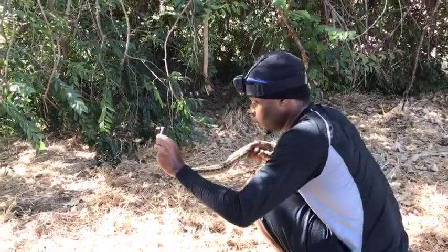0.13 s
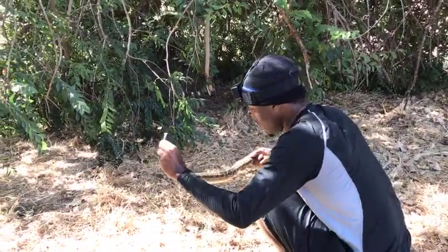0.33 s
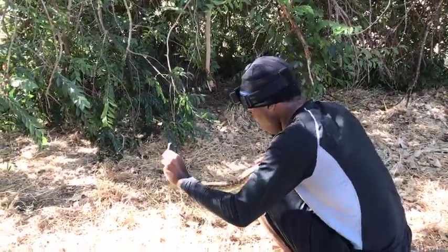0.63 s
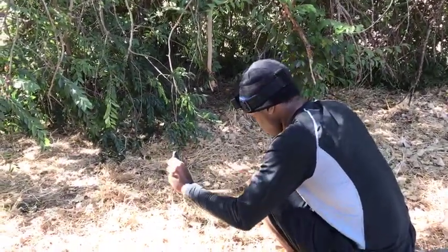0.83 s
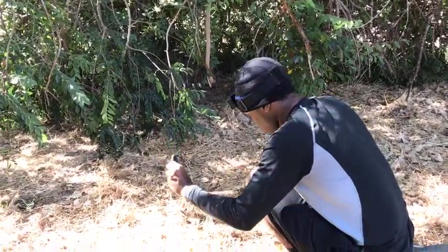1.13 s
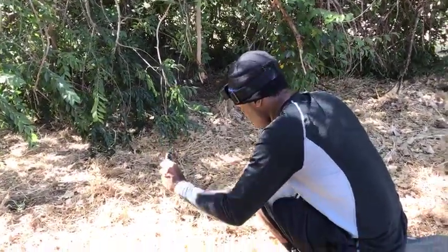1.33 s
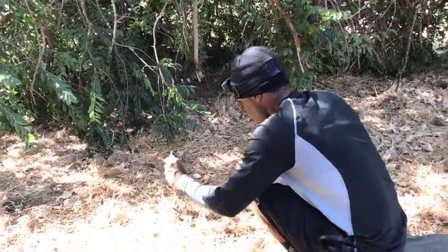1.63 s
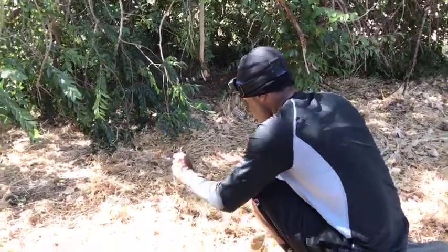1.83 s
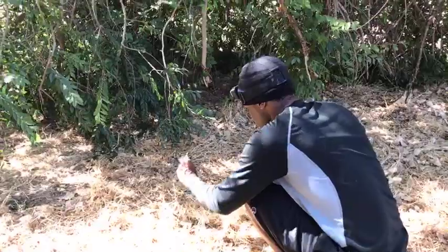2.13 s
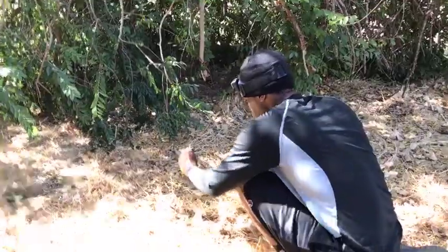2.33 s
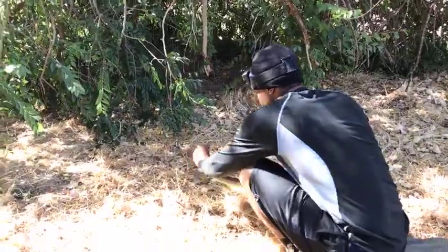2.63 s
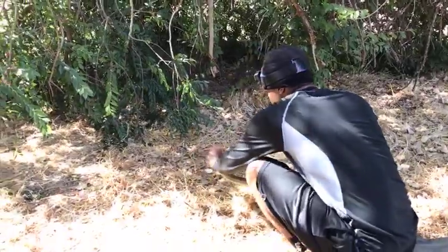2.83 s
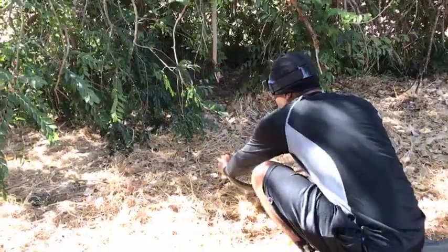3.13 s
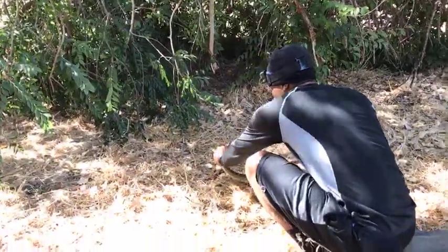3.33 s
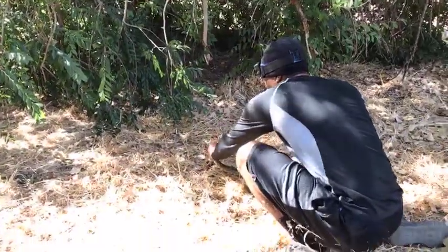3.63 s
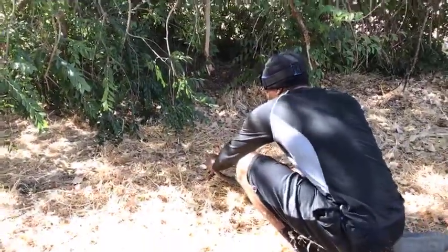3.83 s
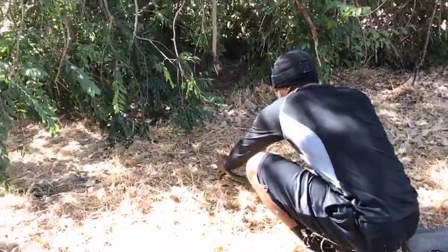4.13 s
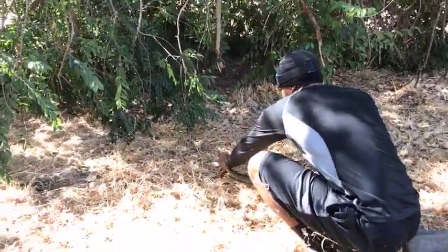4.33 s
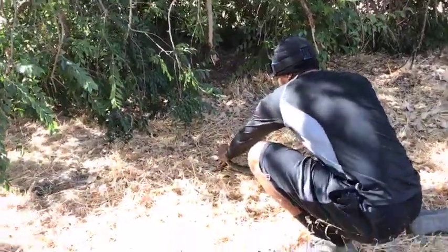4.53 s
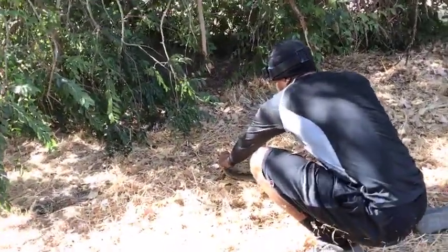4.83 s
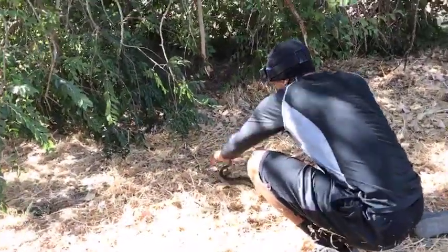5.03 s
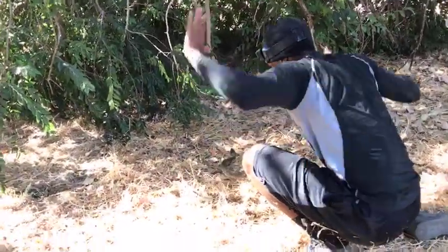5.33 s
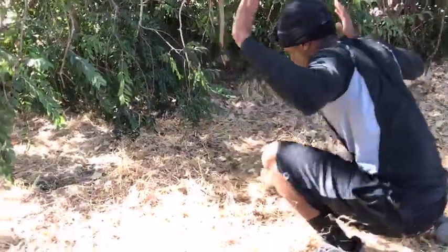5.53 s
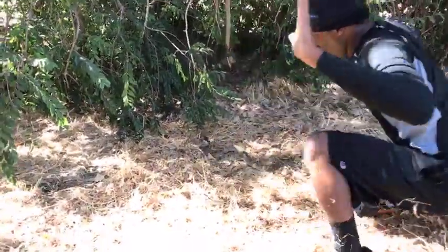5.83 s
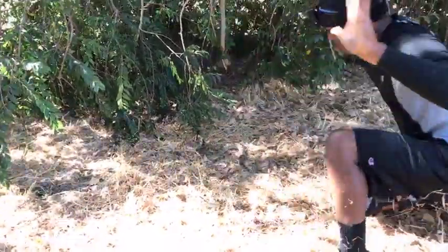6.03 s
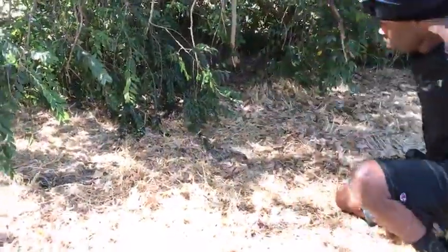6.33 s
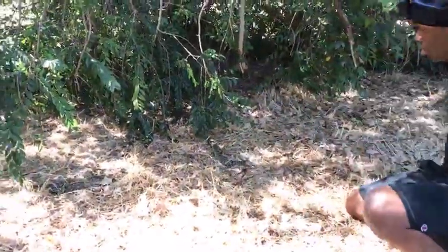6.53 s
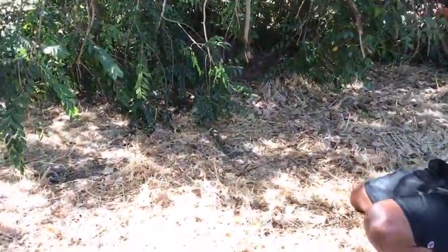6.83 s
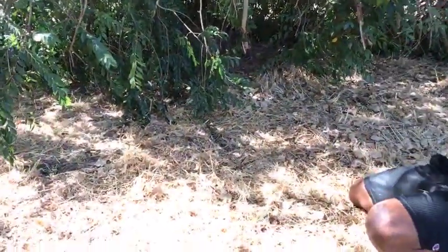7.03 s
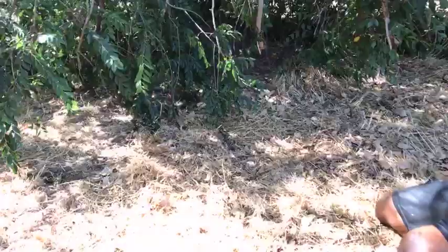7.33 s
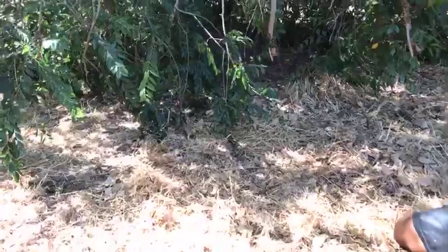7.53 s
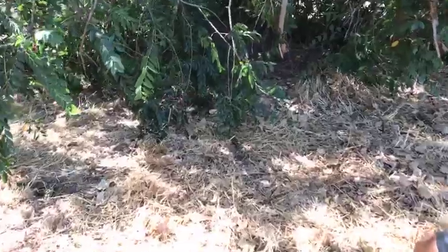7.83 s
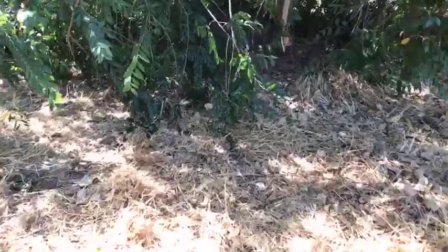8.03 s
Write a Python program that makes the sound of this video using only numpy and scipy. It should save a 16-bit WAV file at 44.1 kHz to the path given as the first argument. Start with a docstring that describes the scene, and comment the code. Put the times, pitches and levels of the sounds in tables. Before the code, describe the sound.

A rattlesnake close to the microphone in dry brush gives quick, faint runs of rattle flicks, then falls silent while dry stems crackle and snap. After a pause it flicks again and breaks into a steady, bright, sizzling buzz that surges strongly, dips, throbs, and rises again at the end. Feet scuff leaf litter with dull knocks. Far traffic rumbles softly underneath with a low machine hum.

```python
"""Rattlesnake in dry brush

In front of one microphone the snake flicks its rattle in short runs, pauses, then buzzes without a break, surging
louder and later throbbing: random clacks ring the hollow segments, with echoes off ground and twigs. Dry grass
crackles under the snake and litter under feet, as clumps of tiny impacts. Far off lie filtered-noise traffic,
a humming machine and a droning vehicle."""
import sys
import numpy as np
from scipy import signal
from scipy.fft import rfft, irfft
from scipy.io import wavfile
from scipy.ndimage import map_coordinates

SR = 44100
rng = np.random.default_rng(int(sys.argv[2]) if len(sys.argv) > 2 else 0)


def store_wav(level_fs):
    """Save 16-bit WAV to argv[1]."""
    pcm = np.round(np.clip(np.atleast_2d(level_fs), -1, 1) * 32767)
    wavfile.write(sys.argv[1], SR, pcm.T.astype(np.int16))


N = 360297
T = np.arange(N) / SR  # time in seconds

# colour of the hollow segments: [f/Hz, relative level/dB]
SHELL_COLOUR = [(900, -45), (2100, -21.5), (2900, -11.5), (3600, -9.5), (4300, -4.5), (5200, -1.5),
                (6200, -2), (7100, -1.5), (8500, -4.5), (9600, -9.5), (10500, -10), (11600, -7.5),
                (13200, -4), (15400, -8)]
# their sharper resonances: [f/Hz, height above the colour/dB]
SHELL_RESONANCES = [(4470, 4.5), (5220, 4), (6450, 2.5), (7120, 5), (8280, 3.5)]
# the resonances move together as the rattle is turned: [t/s, frequency ratio, share of their height]
RATTLE_TURNING = [(0, 1.02, 1.2), (1.2, 1.015, 0.54), (3, .985, 1.1), (4, 0.99, 1.33), (4.55, 1.06, .7),
                  (4.85, 1.06, .1), (5.7, .98, 0.68), (7.15, .977, 0.48), (7.6, 1.01, 0.83),
                  (8.17, 1.07, 0.85)]


def rattle(mode_width_hz=150, ground_gain=0.23, twig_gain=0.23):
    """The clacks ring the hollow shells; echoes off the ground and nearby twigs make the colour swirl."""
    ring = colour(clacking() * shaking(), SHELL_COLOUR)
    t, ratio, share = np.transpose(RATTLE_TURNING)
    ratio_now, share_now = np.interp(T, t, ratio), np.interp(T, t, share)
    for hz, height_db in SHELL_RESONANCES:
        extra_gain = amp(height_db * share_now) - 1
        ring = ring + extra_gain * resonate(ring, hz * ratio_now, mode_width_hz)
    # detours of about 0.2 m and 1 m
    ground_echo = ground_gain * echo(ring, delay_s=0.000601, travel_s=.00007, hz=3)
    twig_echo = twig_gain * echo(ring, delay_s=.003, travel_s=.0001, hz=1.2)
    return posture(0.91 * (ring + ground_echo + twig_echo))


# speed of the tail: [t/s, turns per s]
TAIL_SPEED = [(0, 155), (3.2, 144), (3.9, 175), (5.05, 180), (5.3, 156), (6.1, 179), (6.85, 162),
              (7.4, 143), (7.85, 177), (8.17, 170)]


def clacking(turn_db=1.5, rebound_db=0.9, lopsided_db=0.45, jitter=0.019, uneven_db=0.5):
    """Loose segments clack in a cluster at each turn of the tail and again on the rebound."""
    speed = curve(TAIL_SPEED) * (1 + jitter * wander(25))
    turn = 2 * np.pi * np.cumsum(speed) / SR
    beat_db = turn_db * np.cos(turn) + rebound_db * np.cos(2 * turn)
    beat_db += lopsided_db * np.cos(turn / 2)  # every other turn is stronger
    return unit(clicks(per_s=12000, spread_db=2.0) * amp(beat_db + uneven_db * wander(220)))


# evenly spaced flicks: [start t/s, number of flicks, interval/s, first relative level/dB, last relative level/dB]
TAIL_FLICKS = [(0.008, 2, 0.063, -41, -41), (0.119, 11, 0.05, -40, -48), (0.685, 5, .0495, -47, -49),
               (1.184, 3, .0595, -51.5, -48.5), (1.412, 1, 0, -50.5, -50.5),
               (1.494, 3, 0.0604, -46.5, -49.5), (1.754, 3, 0.066, -49, -52), (3.011, 2, .065, -49, -48.5),
               (3.129, 7, 0.047, -49.5, -51)]
# unbroken shaking, a short bout and a long one: [t/s, relative level/dB]
SHORT_SHAKE = [(.89, -50.5), (1.15, -49)]
LONG_SHAKE = [(3.43, -51.5), (3.68, -51), (3.78, -49.5), (4.48, -48), (4.83, -45.5), (5.16, -46.2),
              (5.31, -44.5), (5.51, -42), (5.58, -37.5), (5.67, -37), (5.81, -41), (5.9, -36.5),
              (6.38, -34.5), (6.95, -39), (7.35, -42.5), (7.58, -40), (8.03, -39.5), (8.17, -34)]


def shaking(flick_db=3.5, buzz_db=2.15, swell_db=0.53):
    """Strength of the tail's motion: flicks and unbroken bouts add by power."""
    flick_power = 0
    for start, count, interval, first_db, last_db in TAIL_FLICKS:
        for k, db in enumerate(np.linspace(first_db, last_db, round(count))):
            flick_power = flick_power + flick(start + k * interval, db) ** 2
    bouts = level(SHORT_SHAKE) + level(LONG_SHAKE)
    buzz = bouts * amp(buzz_db + throb() + swell_db * wander(17))
    return np.hypot(amp(flick_db) * np.sqrt(flick_power), buzz)


def flick(s, db, rise_s=0.0069, full_length_s=0.019, full_db=-41, linger_per_db=0.0562, roundness=1.38):
    """One throw of the rattle: a quick start, then the segments settle, lingering longer if weak."""
    age = np.maximum(T - s, 0)
    length = full_length_s * np.exp(linger_per_db * (full_db - db))
    settling = np.exp(-(age / length) ** roundness / roundness)
    return amp(db) * np.minimum(age / rise_s, 1) * settling


# late in the long bout the tail sways and the buzz throbs: [t/s, throbs per s, depth/dB]
TAIL_SWAY = [(6.831, 26.8, 1.7), (7.3, 27.0, 2.2), (7.47, 24.1, 5), (7.65, 29.4, 1.5), (8.17, 29, 1)]


def throb(onset_s=.1, sag=0.11):
    """Swing of the buzz in dB as the tail sways; a deep sway also weakens it a little."""
    t, per_s, depth_db = np.transpose(TAIL_SWAY)
    turns = np.cumsum(np.interp(T, t, per_s)) / SR
    onset = np.clip(1 + (T - t[0]) / onset_s, 0, 1)
    depth = np.interp(T, t, depth_db) * onset
    swing = np.cos(2 * np.pi * (turns - np.interp(t[0], T, turns)))
    return depth * (swing - sag * depth)


# tilt of the rattle's treble: [t/s, slope/dB per octave]
TREBLE_TILT = [(0, -3), (1, .5), (3.9, -0.5), (4.65, -2), (5.38, -.7), (5.62, 1.6), (6, -0.8), (6.8, -.3),
               (7.3, 1.5), (7.7, .1)]
# gain of the shells' low band and of their main band: [t/s, level/dB]
LOW_BAND_GAIN = [(0, -9), (1, 4), (3.2, 0.5), (4.25, -6.5), (4.65, 3), (5.8, 2.5), (6.05, -.5), (6.8, -1),
                 (7.35, 6), (7.7, -0.5), (8.17, 3)]
MAIN_BAND_GAIN = [(0, 1.5), (4.3, -1.5), (4.65, 1), (5.26, -2.5), (5.36, 4), (5.82, 4), (6, 0), (7.2, 2.5),
                  (8.17, -0.5)]


def posture(ring, low_hz=3000, main_hz=4600, band_width_hz=680, pivot_hz=6500):
    """The shells radiate different colours as the rattle is held up or lowered."""
    f, t, spectrum = signal.stft(ring, SR, nperseg=256)
    f = f[:, None]
    octaves = np.log2(np.maximum(f, low_hz) / pivot_hz)  # level stays even below low_hz
    db = octaves * curve(TREBLE_TILT, t)
    for hz, band in ((low_hz, LOW_BAND_GAIN), (main_hz, MAIN_BAND_GAIN)):
        db = db + np.exp(-((f - hz) / band_width_hz) ** 2) * curve(band, t)
    return signal.istft(spectrum * amp(db), SR, nperseg=256)[1][:N]


# the snake pushes through dry grass, and feet scuff the litter: [middle t/s, relative level/dB, half length/s]
GRASS_SLITHERS = [(1.48, -61.5, 0.071), (1.695, -51.5, 0.032), (1.89, -64.5, 0.064), (2.18, -60, 0.064),
                  (2.33, -74, 0.12)]
LITTER_SCUFFS = [(5.31, -64, .03), (5.46, -60, .04), (5.83, -65, .05), (6.03, -56, .018),
                 (6.26, -58, 0.039), (6.37, -55.5, .035), (7.0, -63.5, .07), (7.26, -59.5, 0.032),
                 (7.39, -53, .04), (7.49, -55.5, .025), (7.88, -56, 0.029), (8.02, -53.5, 0.067),
                 (8.135, -48.5, 0.036)]
# colours of dry grass and of leaf litter: [f/Hz, relative level/dB]
GRASS_COLOUR = [(150, -8), (400, -6), (1000, -2), (2200, -0.5), (4000, -0.5), (7000, 1), (10500, 1.5),
                (13000, 1.5), (15500, -6)]
LITTER_COLOUR = [(150, -1.5), (350, -1), (950, 3), (1900, 2), (4000, -0.5), (8000, -4), (15000, -7.5)]


def brush(slither_db=11.0, feet_db=7):
    """Dry stems and leaf litter crackle in clumps of tiny impacts."""
    grass = unit(clicks(per_s=6000, spread_db=1.0) * amp(1.2 * wander(70)))
    litter = unit(clicks(per_s=3000, spread_db=2.5) * amp(2.3 * wander(50)))
    slithers = colour(grass * swells(GRASS_SLITHERS) * amp(slither_db), GRASS_COLOUR)
    scuffs = colour(litter * swells(LITTER_SCUFFS) * amp(feet_db), LITTER_COLOUR)
    return slithers + scuffs


# stems snapping, and dull knocks of twigs and soles on the ground: [t/s, relative level/dB]
STEM_SNAPS = [(1.6703, -28), (1.8072, -35.5), (1.9256, -34.5), (1.9874, -45), (2.0726, -40), (2.265, -38.5),
              (2.2783, -39), (2.5274, -51), (2.6764, -49)]
GROUND_KNOCKS = [(3.153, -38), (5.306, -43), (7.352, -40.5), (7.382, -45), (7.447, -44), (7.462, -40.5),
                 (7.985, -40), (8.106, -42), (8.138, -32.5), (8.147, -38), (8.165, -35)]
# colour of the knocks: [f/Hz, relative level/dB]
KNOCK_COLOUR = [(150, -14), (400, -3.5), (680, 1), (1000, -3), (2200, -9), (4000, -24), (15000, -45)]


def snaps_and_knocks():
    """Snapping stems crack in the colour of grass; twigs and soles knock the ground, duller and longer."""
    snaps = hits(STEM_SNAPS, GRASS_COLOUR, gain_db=-2.0, fall_s=0.0011)
    knocks = hits(GROUND_KNOCKS, KNOCK_COLOUR, gain_db=1.0, fall_s=.002)
    return snaps + knocks


def hits(rows, points, gain_db, fall_s):
    """Sudden impacts as brief bursts of noise of one colour."""
    strength = sum(amp(db + gain_db) * burst(s, 0.00024, fall_s) for s, db in rows)
    return colour(strength * rng.choice([-1, 1], N), points)


# a far vehicle: [t/s, engine pitch f/Hz, relative level/dB]
FAR_VEHICLE = [(0, 55, -59.5), (.8, 54, -61), (1.3, 53.05, -60), (1.6, 51.96, -54.5), (2.05, 55.9, -54.5),
               (2.55, 53, -55.5), (2.95, 47, -64)]


def vehicle(second_db=-3):
    """The two lowest engine orders of a far vehicle drone with unsteady pitch and level."""
    t, hz, db = np.transpose(FAR_VEHICLE)
    pitch = np.interp(T, t, hz) * (1 + .015 * wander(5.1))
    turn = 2 * np.pi * np.cumsum(pitch) / SR
    first = np.sin(turn) * amp(2 * wander(4))
    second = amp(second_db + 2 * wander(4)) * np.sin(2 * turn)
    return np.sqrt(2) * (first + second) * level(np.transpose([t, db]), fade_s=.1)


# swelling third harmonic of the machine: [t/s, level/dB before wavering]
THIRD_HARMONIC = [(.15, -59), (.9, -72), (1.8, -74.5), (3, -59), (4.2, -71.5), (4.6, -63), (5.1, -74),
                  (5.7, -62), (8.17, -65)]


def machine(hum_hz=65.66, first_db=-54.5, second_db=-65):
    """A far machine hums on three harmonics, each wavering in level and phase."""
    hum = 0
    for k, gain in enumerate((amp(first_db), amp(second_db), amp(curve(THIRD_HARMONIC))), 1):
        phase = 2 * np.pi * k * hum_hz * T + .5 * wander(4.3)
        hum = hum + gain * amp(1.43 * wander(2)) * np.sin(phase)
    return np.sqrt(2) * hum


# wash of far traffic: [f/Hz, relative level/dB per Hz]
WASH_COLOUR = [(20, -6.5), (70, 10), (120, 8.5), (170, 3), (260, -3.5), (420, -6), (700, -1.5), (1020, 1.5),
               (1400, -3.5), (2000, -10.5), (4000, -14.5), (7000, -18.5), (10500, -24), (15000, -28)]
# rumble of the far traffic: [t/s, level/dB], and its colour: [f/Hz, relative level/dB]
RUMBLE_LEVEL = [(0, -52), (.7, -55), (2.4, -54.5), (4, -59), (4.6, -54), (5.3, -56.5), (6.8, -52),
                (7.4, -56)]
LOW_RUMBLE_COLOUR = [(20, -40), (37, -16), (54, 0), (80, 0.5), (95, -6.5), (112, -3), (150, -15.5),
                     (300, -45)]


def traffic(wash_db=-54):
    """Far traffic blends into a gently wavering wash of noise over a low rumble."""
    wash = amp(wash_db) * colour(rng.standard_normal(N), WASH_COLOUR) * amp(.5 * wander(4.1))
    rumble = colour(rng.standard_normal(N), LOW_RUMBLE_COLOUR, size=8192)
    return wash + amp(curve(RUMBLE_LEVEL)) * rumble


def amp(db):
    """Decibels to gain."""
    return 10 ** (np.asarray(db) / 20)


def unit(x):
    """Scales to rms 1."""
    return x / np.sqrt(np.mean(x ** 2) + 1e-20)


def curve(rows, t=T):
    """Joins (t/s, value) rows by straight lines."""
    return np.interp(t, *np.transpose(rows))


def level(rows, fade_s=0.018):
    """Gain that follows (t/s, level/dB) rows and fades out beyond them."""
    s, db = np.transpose(rows)
    outside = np.maximum(np.maximum(s[0] - T, T - s[-1]), 0)
    return amp(np.interp(T, s, db)) * np.exp(-outside / fade_s)


def wander(hz):
    """Slow random motion of rms 1, from noise low-passed around hz."""
    f = np.fft.rfftfreq(N, 1 / SR)
    spectrum = rfft(rng.standard_normal(N)) * np.exp(-(f / hz) ** 2)
    return unit(irfft(spectrum, N))


def colour(x, points, size=2048):
    """Causal filter of unit energy with a (f/Hz, level/dB) outline."""
    f = abs(np.fft.fftfreq(size, 1 / SR))
    hz, db = np.transpose(points)
    db = np.interp(np.log(f + 1), np.log(hz), db)
    minimum_phase = np.exp(np.conj(signal.hilbert(np.log(amp(db)))))
    ring = np.fft.ifft(minimum_phase).real
    return signal.oaconvolve(x, ring / np.linalg.norm(ring))[:N]


def resonate(x, hz, width_hz):
    """A resonance of gain 1 that follows the curve hz."""
    turn = np.exp(2j * np.pi * np.cumsum(hz) / SR)
    r = np.exp(-np.pi * width_hz / SR)
    # shift the resonance to 0 Hz, smooth there, shift back
    smooth = signal.lfilter([1 - r], [1, -r], x / turn + 1e-18)
    return 2 * (turn * smooth).real


def echo(x, delay_s, travel_s, hz):
    """A reflection whose path lengthens and shortens as the source moves."""
    return map_coordinates(x, [(T - delay_s - travel_s * wander(hz)) * SR], order=3)


def clicks(per_s, spread_db):
    """Random tiny impacts of uneven size, rms 1."""
    size = amp(spread_db * np.minimum(rng.exponential(1, N), 4)) * rng.choice([-1, 1], N)
    return unit(size * (rng.random(N) < per_s / SR))


def burst(s, rise_s, fall_s):
    """Envelope that climbs to 1 from time s and dies away."""
    age = np.maximum(T - s, 0)
    return np.minimum(age / rise_s, 1) * np.exp(-np.maximum(age - rise_s, 0) / fall_s)


def swells(rows, roundness=1.31):
    """Gain of strokes that swell and ebb evenly about their middle, added by power."""
    return np.sqrt(sum(amp(db) ** 2 * np.exp(-abs((T - s) / half) ** roundness) for s, db, half in rows))


def scene():
    """Snake, brush and far background at one microphone."""
    near = rattle() + brush() + snaps_and_knocks()
    far = vehicle() + machine() + traffic()
    return (near + far)[None]


def record(dry, notch_hz=10450, notch_width_hz=450, notch_db=-7, edge_hz=15420):
    """The microphone port's narrow notch, then the band limit."""
    notch = resonate(dry[0], np.full(N, notch_hz), notch_width_hz)
    heard = dry[0] + (amp(notch_db) - 1) * notch
    low_pass = signal.firwin(511, edge_hz, window=("kaiser", 9), fs=SR)
    return signal.oaconvolve(heard, low_pass, "same")[None]


dry = scene()
out = record(dry)
store_wav(out)
```